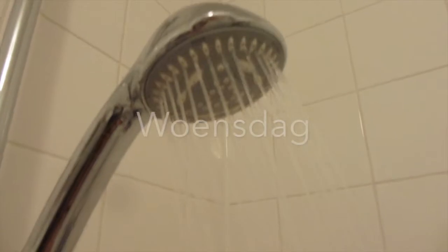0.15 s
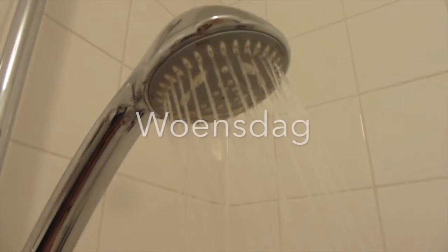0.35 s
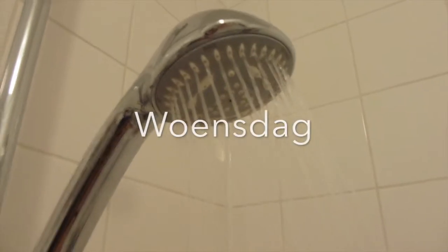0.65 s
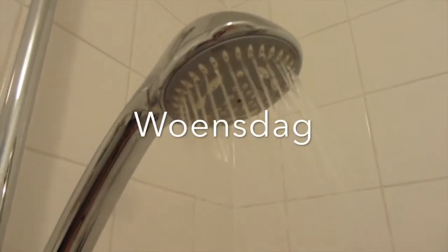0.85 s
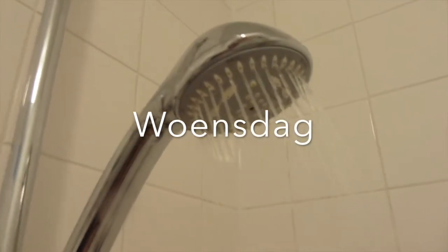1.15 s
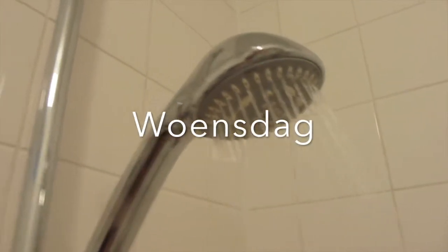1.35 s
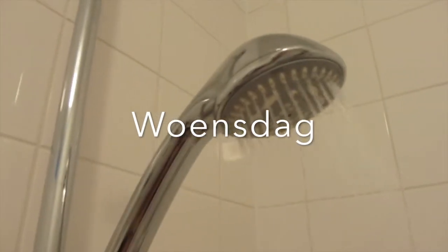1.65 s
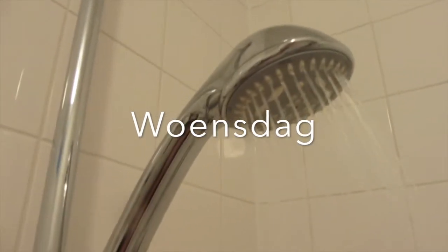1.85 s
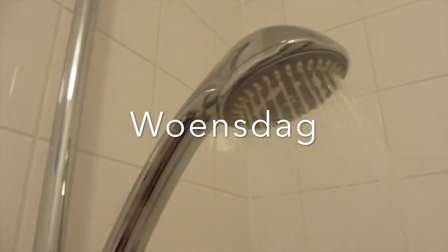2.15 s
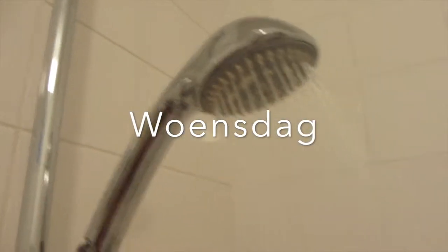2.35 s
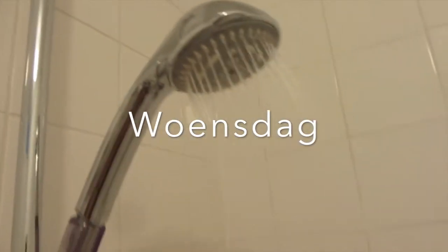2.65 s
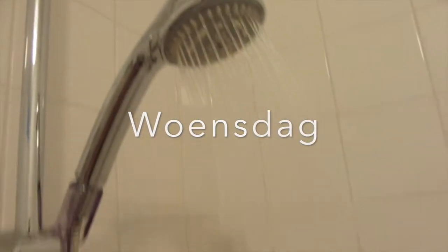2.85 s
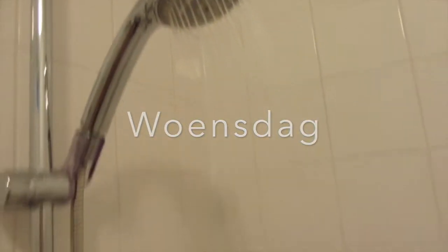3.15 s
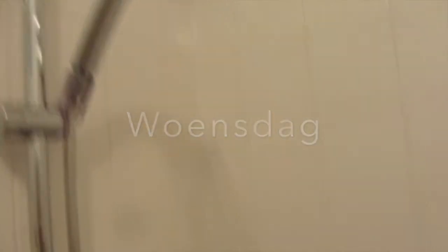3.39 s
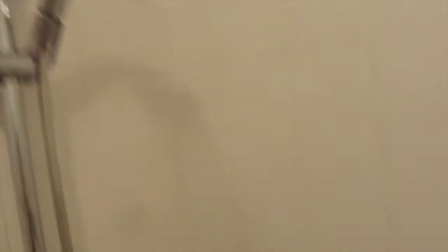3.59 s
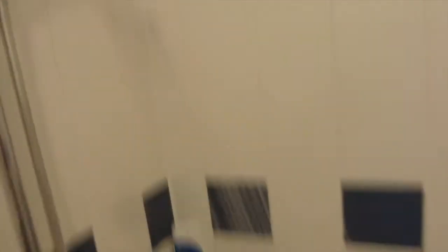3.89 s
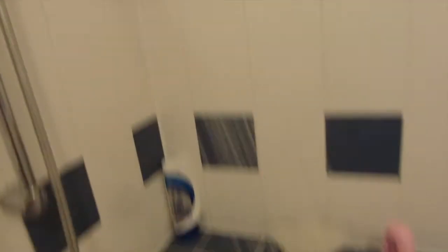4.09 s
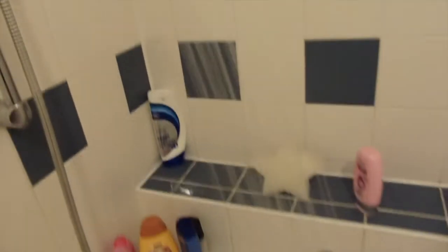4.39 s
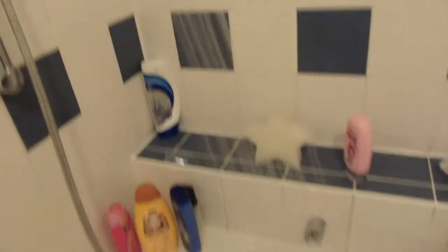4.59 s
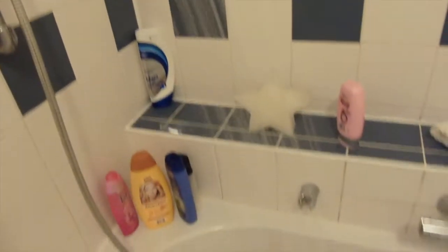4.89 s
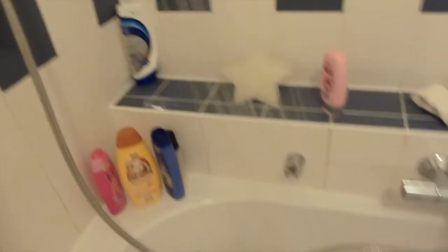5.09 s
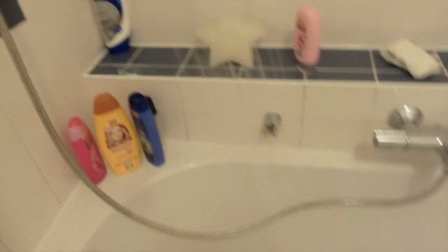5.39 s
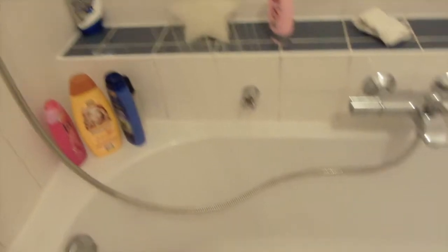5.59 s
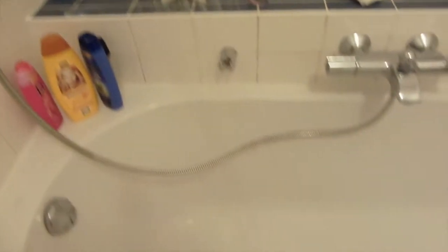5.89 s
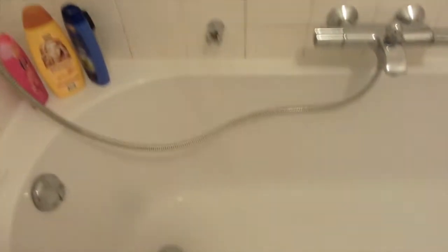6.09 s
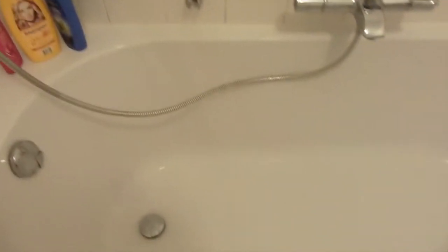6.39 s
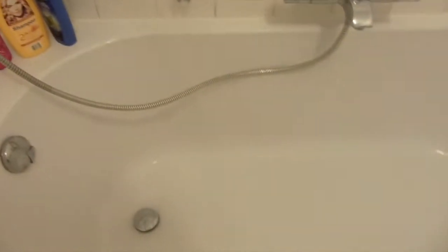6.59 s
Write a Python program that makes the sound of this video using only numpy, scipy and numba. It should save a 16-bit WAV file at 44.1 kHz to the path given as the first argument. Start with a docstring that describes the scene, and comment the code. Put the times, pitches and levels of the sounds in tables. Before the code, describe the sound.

Very close in a small tiled bathroom, a handheld shower head starts with a violent splashy surge, watery knocks and gulping bubbles. Air spits from the nozzles in rapid click bursts. Within about half a second it drops sharply to a quiet, fizzing spray with sparse sputters, a faint low hum in spells and a few drips. Short bright reflections.

```python
"""A shower head just turned on in a small tiled bathroom, heard from close by. Slugs of water knock in the
filling head, air pockets sputter out of the nozzles as short trains of clicks, and big bubbles gulp. The spray
(bands of noise) surges, then settles under fizzing jets and ringing droplets. A low hum comes in spells; later
lone drops fall, a nozzle ticks once, and a murmur swells twice. Tiles add a short tail to all but spray, hum
and murmur."""
import sys
import numpy as np
from scipy import signal
from scipy.fft import rfft, irfft, next_fast_len
from scipy.io import wavfile
from scipy.ndimage import uniform_filter1d
from numba import njit

SR = 44100
rng = np.random.default_rng(int(sys.argv[2]) if len(sys.argv) > 2 else 0)


def bounce(signal):
    """Save signal as a 16-bit WAV file at the path given by the first command-line argument."""
    frames = np.transpose(np.atleast_2d(signal))
    limited = np.clip(frames, -1, 1)
    pcm = np.round(limited * 32767).astype(np.int16)
    wavfile.write(sys.argv[1], SR, pcm)


N = 297278


def undb(db):
    """Amplitude of a level in dB."""
    return 10 ** (np.asarray(db) / 20)


def unit(x):
    """Scale to an RMS of 1."""
    return x / np.sqrt(np.mean(x ** 2))


def rare(u):
    """Exponential spread from uniform u: mostly small, now and then large, at most 3."""
    return np.minimum(-np.log(u), 3)


def curve(table):
    """Columns of a table joined by straight lines in time."""
    time_s, *columns = np.transpose(table)
    return [np.interp(np.arange(N) / SR, time_s, c) for c in columns]


def band(x, hz, width_oct):
    """Bell-shaped band around hz."""
    size = next_fast_len(len(x))
    f = np.fft.rfftfreq(size, 1 / SR) + 1
    gain = np.exp(-.5 * (np.log2(f / hz) / width_oct) ** 2)
    return irfft(rfft(x, size) * gain, size)[:len(x)]


def walk(rate_hz):
    """Random levels held 1 / rate_hz and smoothed twice; spread near 1."""
    hold = int(SR / rate_hz)
    steps = np.repeat(rng.standard_normal(N // hold + 1), hold)
    return np.sqrt(2) * uniform_filter1d(uniform_filter1d(steps, hold), hold)[:N]


@njit
def wavelets(n, s, hz, cycles, size, sr):
    """Bell-shaped wave packets without net pressure: few cycles click, many fizz."""
    y = np.zeros(n)
    for k in range(len(s)):
        spread_s = cycles[k] / hz[k] / 4
        mean = np.exp(-.5 * (np.pi * cycles[k] / 2) ** 2)
        first = max(int((s[k] - 4 * spread_s) * sr), 0)
        last = min(int((s[k] + 4 * spread_s) * sr) + 1, n)
        for i in range(first, last):
            t = i / sr - s[k]
            bell = np.exp(-.5 * (t / spread_s) ** 2)
            y[i] += size[k] * bell * (np.cos(2 * np.pi * hz[k] * t) - mean)
    return y


@njit
def bubbles(n, s, hz, cycles, size, glide, sr):
    """Damped rings that open within a cycle and rise in pitch as the bubble nears the surface."""
    y = np.zeros(n)
    for k in range(len(s)):
        span = cycles[k] / hz[k] * sr
        start = int(s[k] * sr)
        phase = 0.
        for i in range(min(int(3 * span), n - start)):
            phase += 2 * np.pi * hz[k] * (1 + glide * i / span) / sr
            y[start + i] += size[k] * min(phase / 6, 1.) * np.exp(-2 * i / span) * np.sin(phase)
    return y


def packets(rows):
    """Sum of wave packets from blocks of (centre s, pitch Hz, cycles, amplitude)."""
    return wavelets(N, *np.ascontiguousarray(np.concatenate(rows).T), 1. * SR)


def hum():
    """A low hum that wavers and comes on in spells, with a faint rumble under it."""
    # spells: (start [s], length [s], level [dB])
    spell_table = [(0.777, 0.06, -68), (2.45, .16, -78), (3.026, 0.15, -68), (3.52, 0.077, -66),
                   (3.886, 0.064, -66), (3.995, 0.068, -66.5), (4.166, 0.19, -69), (4.64, 0.35, -66),
                   (6.101, 0.055, -70)]
    hum_hz, ramp_s, rest_db = 153.4, 0.036, -80
    t = np.arange(N) / SR
    swell = undb(rest_db + 3.5 * walk(9))
    for start_s, length_s, db in spell_table:
        edge_s = np.minimum(t - start_s, start_s + length_s - t)
        swell = swell + undb(db) * np.clip(edge_s / ramp_s + .5, 0, 1)
    cycles = np.cumsum(hum_hz * (1 + 0.0076 * walk(3.5))) / SR
    tone = np.sqrt(2) * np.sin(2 * np.pi * cycles) * undb(1.0 * walk(30))
    broad_rumble = undb(-9.5) * unit(band(rng.standard_normal(N), 140, 1.0))
    narrow_rumble = undb(-4) * unit(band(rng.standard_normal(N), 207, 0.14))
    return swell * (tone + broad_rumble + narrow_rumble)


def murmur():
    """A hollow, uneven murmur in the tub: narrow noise that swells twice."""
    # swells: (time of top [s], level [dB])
    swell_table = [(3.12, -61), (5.62, -60)]
    murmur_hz, swell_s = 1083, 0.54
    t = np.arange(N) / SR
    swell = sum(undb(db) * np.exp(-2 * ((t - top_s) / swell_s) ** 2) for top_s, db in swell_table)
    return swell * undb(3.0 * walk(20)) * unit(band(rng.standard_normal(N), murmur_hz, 0.15))


def spray(drum_db, splash_db, hiss_db):
    """Noise bands for countless drops; drumming, splash and hiss blend across pitch."""
    # relative spectrum: (frequency [Hz], density [dB per Hz])
    colour_table = [(25, -46), (75, -31.5), (144, -10.5), (267, -9), (421, -1.5), (509, -1.5), (684, 2),
                    (1380, -5), (2060, -1.5), (3170, -8), (10100, -6), (12000, -12), (13900, -16),
                    (15500, -21)]
    hz_points, db_points = np.transpose(colour_table)
    surges = [c - np.median(c) for c in (drum_db, splash_db, hiss_db)]
    gust, white = walk(19), rng.standard_normal(N)
    out = 0
    # third-octave steps, then sixths
    for octaves in np.r_[np.full(19, 1 / 3), np.full(19, 1 / 6)].cumsum():
        hz = 22 * 2 ** octaves
        width_oct = 1 / 6 if hz < 1900 else 1 / 12
        # 0 drumming, 1 splash, 2 hiss
        place = np.interp(np.log(hz), np.log([150, 600, 2800, 9500]), [-1.0, -0.48, 0.7, 2.0])
        swell = sum(max(1 - abs(place - k), 0) * surge for k, surge in enumerate(surges))
        # each band flickers alone, the treble most; the treble also gusts together
        flicker = (3.64 + 0.35 * abs(place)) * walk(30) + 1.54 * max(place, 0) * gust
        flicker = flicker / (1 + np.maximum(swell, 0) / 12)  # steadier in a surge
        db = np.interp(np.log(hz), np.log(hz_points), db_points) + 10 * np.log10(hz * width_oct)
        noise = unit(band(np.roll(white, rng.integers(N)), hz, width_oct))
        out = out + undb(db + swell + flicker - 87.0) * noise
    return out


def droplets(splash_db, hiss_db):
    """Single drops, thickest at the start, each trapping one tiny bubble that rings briefly."""
    u = rng.random((12000, 4))
    i = (u[:, 0] ** 2 * N).astype(int)
    small = u[:, 2] ** 0.687
    hz = 1500 * 10 ** small
    cycles = hz * (0.001 + 0.0067 * u[:, 3] ** 2)
    db = (1 - small) * splash_db[i] + small * hiss_db[i] + 0.5 - 5.0 * small ** 4
    db = db + 5.9 * rare(u[:, 1]) + 2.63 * np.log(u[:, 0])  # weaker where they crowd
    return bubbles(N, i / SR, hz, cycles, undb(db), 0.028, 1. * SR)


def fizz(s, db, hz, length_s, spread, cycles):
    """Dense irregular clusters of tiny bubbles, each cluster scattered about one pitch."""
    u, v = rng.random((len(s), 24, 2)), rng.standard_normal((len(s), 24))
    t = s[:, None] + length_s * u[..., 0] ** 1.6
    pitch = np.minimum(hz[:, None] * np.exp(spread * v), .45 * SR)
    size = undb(db[:, None] - 10.5 * u[..., 1] - 3.1 * u[..., 0])
    return packets([np.c_[t.ravel(), pitch.ravel(), np.full(t.size, cycles), size.ravel()]])


def small_fizz(hiss_db):
    """Many short fizzes, narrow or wide in pitch, at random times; level follows the jet hiss."""
    u = rng.random((500, 5))
    db = hiss_db[(u[:, 0] * N).astype(int)] + 4.5 + 3 * rare(u[:, 1])
    hz = 2200 * 5.55 ** u[:, 2] ** 0.59
    length_s, spread = .004 + .02 * u[:, 3:4], 0.039 + 0.28 * u[:, 4:] ** 3
    return fizz(u[:, 0] * N / SR, db, hz, length_s, spread, cycles=8.5)


def jet_fizz():
    """Single jets fizzing: clusters of longer wave packets."""
    # fizzes: (start [s], relative level [dB], pitch [Hz], pitch spread [share])
    jet_table = [(.2, -18.5, 11600, 0.11), (0.249, -24.5, 10400, 0.21), (1.098, -28, 6670, 0.11),
                 (1.3722, -35, 5770, 0.048), (1.516, -38, 7500, 0.033), (1.597, -32, 2520, 0.14),
                 (1.752, -34.5, 7900, 0.1), (2.082, -30.5, 6330, 0.12), (2.09, -33.5, 10000, 0.22),
                 (2.173, -35, 7640, 0.11), (2.387, -30.5, 8750, 0.17), (2.754, -39, 10400, 0.079),
                 (3.3197, -29.5, 9100, .09), (3.385, -34, 10050, 0.034), (3.573, -36.5, 5420, 0.022),
                 (3.821, -34, 9200, 0.12), (4.150, -30, 9200, 0.17), (4.177, -34.5, 5850, 0.44),
                 (4.278, -39, 4150, 0.048), (4.9527, -35.5, 8200, 0.24), (5.054, -35, 3140, 0.19),
                 (5.052, -33, 9100, 0.077), (5.4595, -41, 3230, 0.14), (5.605, -30, 9300, 0.23),
                 (5.656, -34, 8300, 0.21), (5.745, -32.5, 6470, 0.2), (5.993, -38, 7200, 0.09),
                 (6.118, -36, 12000, 0.085), (6.2364, -33.5, 9300, 0.17), (6.551, -31, 2720, .2),
                 (6.575, -34, 3050, 0.13), (6.582, -33.5, 7860, 0.18), (6.7154, -36.5, 3600, 0.24)]
    s, db, hz, spread = np.transpose(jet_table)
    return fizz(s, db, hz, .022, spread[:, None], cycles=16.5)


def gulps(drum_db):
    """Big bubbles in the tub water swell and shrink over a random patter of smaller rings."""
    # big bubbles: (time of top [s], relative level [dB], pitch [Hz])
    gulp_table = [(0.112, -28, 420), (.159, -17.5, 1070), (0.178, -14.5, 1040), (.451, -33, 690),
                  (.512, -32, 650), (.804, -32.5, 600), (1.1365, -24, 570), (1.149, -21.5, 526),
                  (1.156, -25, 1150), (1.16, -27, 810), (1.168, -28.5, 570), (1.19, -31, 635),
                  (1.222, -32, 570), (2.195, -34.5, 640), (2.286, -39, 577)]
    s, db, hz = np.transpose(gulp_table)
    big = packets([np.c_[s, hz, np.full(len(s), 4.6), undb(db)]])
    u = rng.random((1400, 3))
    size = undb(drum_db[(u[:, 0] * N).astype(int)] + 2.0 * rare(u[:, 1]))
    pitch = 420 * 2.67 ** u[:, 2]
    patter = bubbles(N, u[:, 0] * N / SR, pitch, np.full(len(u), 5.5), size, 0.47, 1. * SR)
    return big + patter


def drips():
    """Lone drops as short plinks, plus one dry tick of air from a nozzle: one wave packet each."""
    # drops, and one nozzle tick at 3.086 s: (time of top [s], peak level [dB], pitch [Hz], length [cycles])
    drip_table = [(3.086, -37, 4600, 6.7), (5.0483, -30, 2930, 15), (4.399, -36, 3070, 10),
                  (4.42, -36, 2860, 11), (5.172, -40, 2800, 9), (6.551, -37, 1580, 8.3)]
    s, db, hz, cycles = np.transpose(drip_table)
    return packets([np.c_[s, hz, cycles, undb(db)]])


def churn():
    """Each slug of water is three quick knocks that ring the cavity of the part-filled head."""
    # slugs: (time [s], loudest possible knock [dB])
    slug_table = [(.038, -32), (0.054, -25.5), (0.06, -21), (.078, -27), (.091, -20.5), (.101, -28),
                  (.118, -24), (.129, -20), (.139, -27), (.16, -22), (.186, -18), (.495, -28),
                  (0.516, -29.5)]
    cavity_hz = 1840
    s, db = np.transpose(slug_table)
    u = rng.random((len(s), 3, 3))
    t = s[:, None] + 0.00424 * (u[..., 0] - .5)
    hz = cavity_hz * (1 + 0.21 * (u[..., 1] - .5))
    size = undb(db[:, None] - 6 * u[..., 2])
    return packets([np.c_[t.ravel(), hz.ravel(), np.full(t.size, 5.5), size.ravel()]])


def sputter():
    """Air pockets leave the nozzles as near-regular click trains; clicks snap and ring on briefly."""
    # pockets: (start [s], length [s], click rate [1/s], click pitch [Hz], relative level [dB],
    # place of peak [0-1 of length])
    pocket_table = [(0.1724, 0.012, 510, 2770, -8.5, 0), (0.187, 0.014, 490, 3600, -5, 0.3),
                    (0.214, 0.068, 455, 4100, -9.5, 0.5), (0.341, 0.036, 420, 4100, -18, 1),
                    (0.508, 0.013, 465, 4140, -15.5, 0.5), (0.605, 0.005, 420, 4230, -25, 0.4),
                    (0.613, 0.012, 470, 3450, -13, 0.7), (0.637, 0.01, 360, 4240, -16, 0.05),
                    (0.702, 0.016, 450, 4300, -18.5, 0.15), (0.766, 0.0072, 560, 3830, -22, 0.05),
                    (0.881, 0.001, 450, 3470, -16, 0.4), (1.036, 0.012, 510, 3500, -9.5, 0.87),
                    (1.257, 0.0081, 484, 3300, -13, 0.9), (1.488, 0.0032, 315, 2200, -23.5, 0.5),
                    (1.587, 0.0073, 510, 2800, -14, 0.6), (1.785, 0.0069, 500, 4040, -26, 0),
                    (2.121, 0.018, 440, 4700, -18.5, 0.4), (2.165, 0.0042, 580, 3300, -17, 0.5)]
    nozzle_low_hz = 1370
    rows = []
    for start_s, length_s, rate, hz, peak_db, top in pocket_table:
        t = np.arange(int(length_s * rate) + 1) / rate
        chance = rng.standard_normal((40, 4))[:len(t)]
        off = (t / length_s - top) / np.where(t < top * length_s, top + 0.04, 1.05 - top)
        db = peak_db - 11 * off ** 2 + 1.6 * chance[:, 2]
        t = start_s + t + 0.022 * chance[:, 0] / rate
        same = np.ones(len(t))
        click = np.c_[t, hz * (1 + .08 * chance[:, 1]), 1.6 * same, undb(db)]
        snap = np.c_[t, 11500 * same, 1.8 * same, undb(db - 19.5 + 3.0 * chance[:, 3])]
        ring = np.c_[t + .0008, hz * np.exp(.25 * chance[:, 3]), 5.0 * same, undb(db - 13)]
        rows += [click, snap, ring]
    high_pass = signal.butter(2, nozzle_low_hz, "high", fs=SR, output="sos")
    return signal.sosfiltfilt(high_pass, packets(rows))


def tiles(x):
    """Dense, ragged tail of reflections with a fast onset; the treble dies first."""
    # decay bands: (frequency [Hz], t60 [s] of the late decay)
    decay_table = [(300, 0.29), (1500, 0.25), (5000, 0.21), (14000, 0.16)]
    t = np.arange(SR // 2) / SR
    tail = 0
    for hz, t60_s in decay_table:
        tail = tail + band(rng.standard_normal(len(t)), hz, 1.0) * np.exp(-np.log(1000) * t / t60_s)
    onset = (1 - np.exp(-t / 0.00029)) * (1 + 0.94 * np.exp(-t / 0.009))  # early part stronger
    tail = tail * undb(2.6 * walk(400)[:len(t)]) * onset
    return signal.fftconvolve(x, undb(-4.5) * tail / np.sqrt(np.sum(tail ** 2)))[:N]


def scene():
    """Spray, hum and murmur behind the close clicks and wet sounds and their tile tail."""
    # surge, then settling: (time [s], drumming [dB], splash [dB], jet hiss [dB]), relative levels
    flow_table = [(0, -58, -33.5, -78), (0.03, -41, -25, -63), (0.07, -66, -32, -83),
                  (0.096, -43, -26.5, -50), (0.165, -35.5, -23, -46), (0.19, -37.5, -18.5, -35),
                  (0.27, -37, -30.5, -57), (0.31, -45, -28.5, -52), (0.37, -39, -28, -55),
                  (0.42, -49.5, -33, -63), (0.56, -47.5, -44.5, -61), (.7, -44.5, -46.5, -54.5),
                  (.9, -49.5, -59, -60), (1.5, -50, -61, -58), (2.4, -55.5, -58.5, -62),
                  (3.3, -56.5, -58.5, -56), (4.6, -57, -59.5, -57.5), (5.6, -58.5, -57, -55.5),
                  (6.74, -53.5, -54, -54)]
    drum_db, splash_db, hiss_db = curve(flow_table)
    background = spray(drum_db, splash_db, hiss_db) + hum() + murmur()
    wet = jet_fizz() + small_fizz(hiss_db) + droplets(splash_db, hiss_db) + gulps(drum_db)
    clicks = sputter() + drips() + churn()
    # the wet sounds are weaker direct than in the tail
    return (clicks + undb(-5.5) * wet + tiles(clicks + wet) + background)[None]


def record(dry):
    """Steep elliptic low-pass cuts the top."""
    top_hz = 15700
    return signal.sosfilt(signal.ellip(12, .3, 80, top_hz, fs=SR, output="sos"), dry)


dry = scene()
out = record(dry)
bounce(out)
```